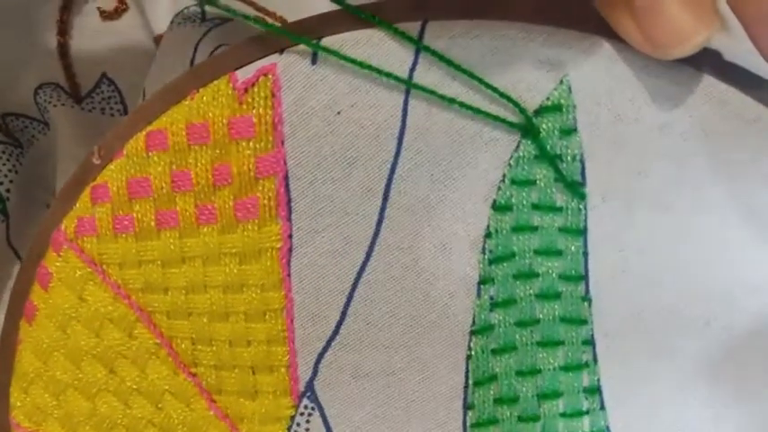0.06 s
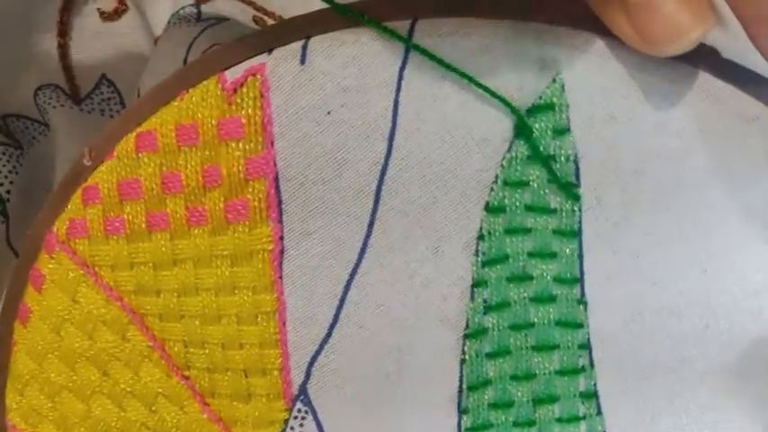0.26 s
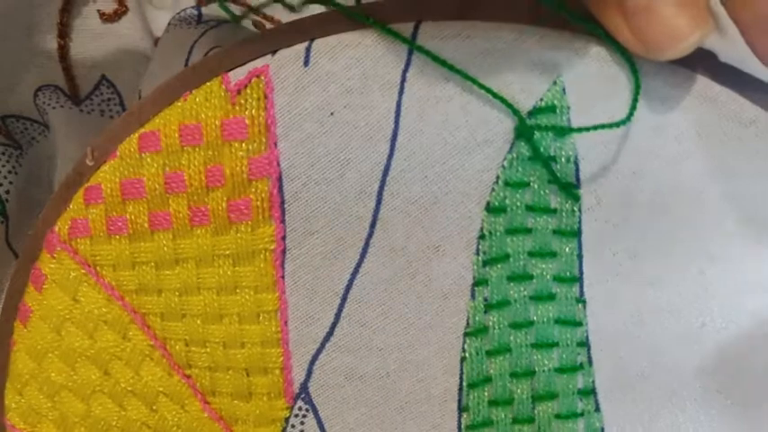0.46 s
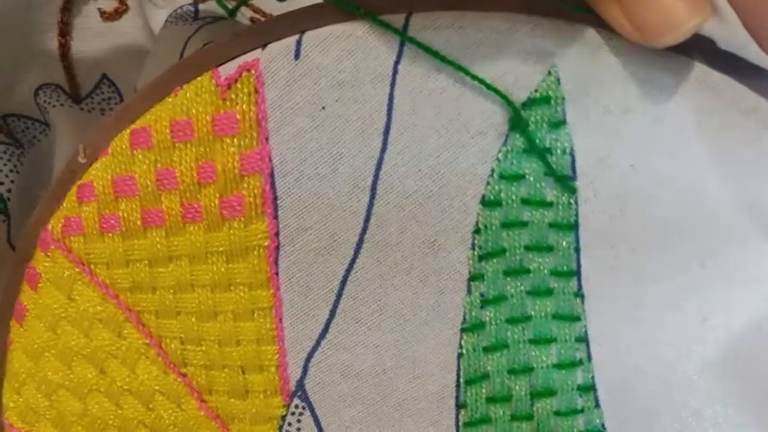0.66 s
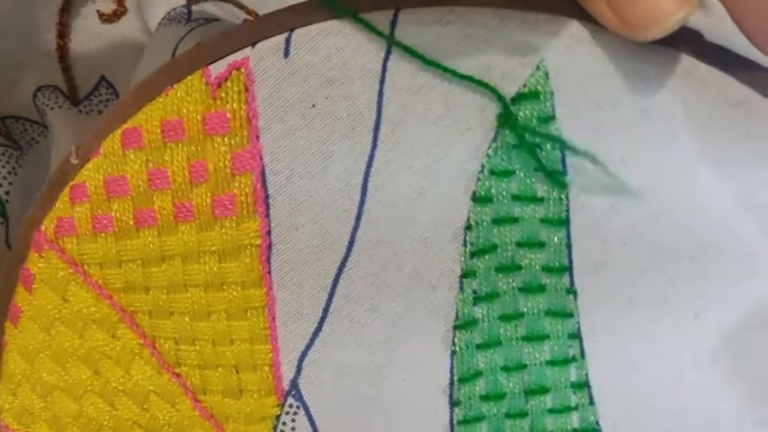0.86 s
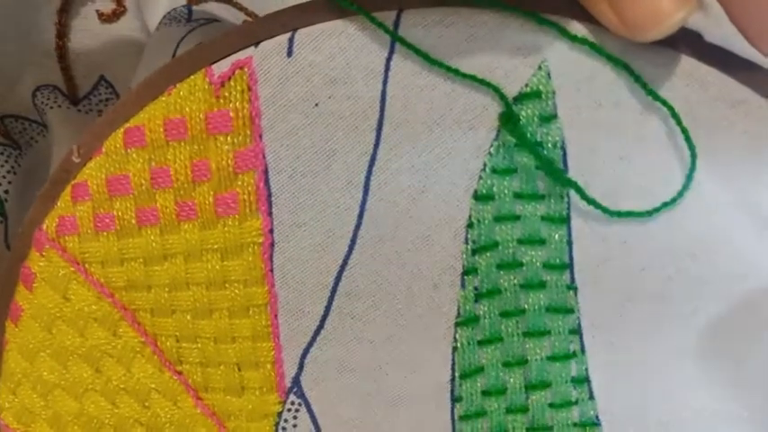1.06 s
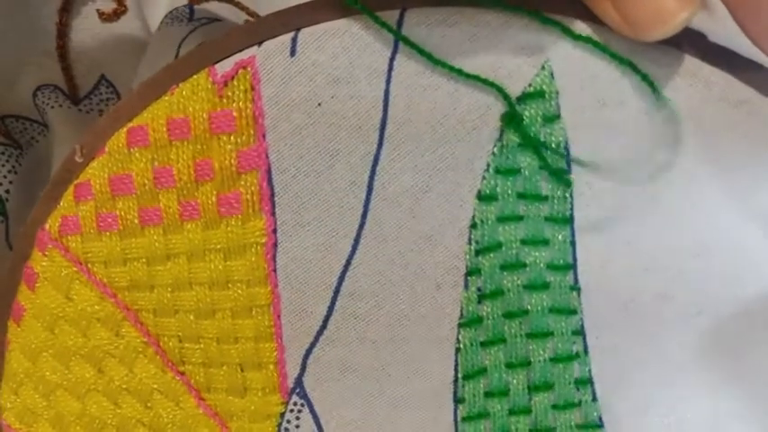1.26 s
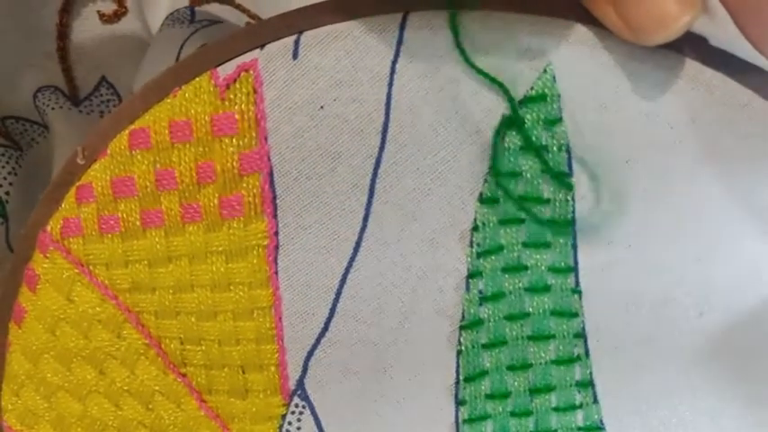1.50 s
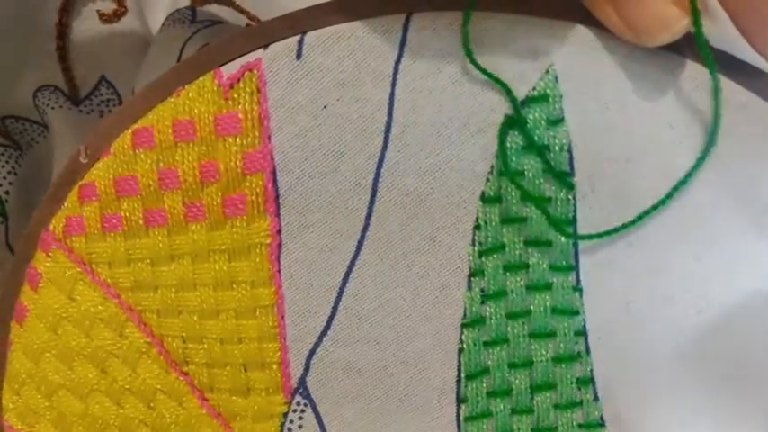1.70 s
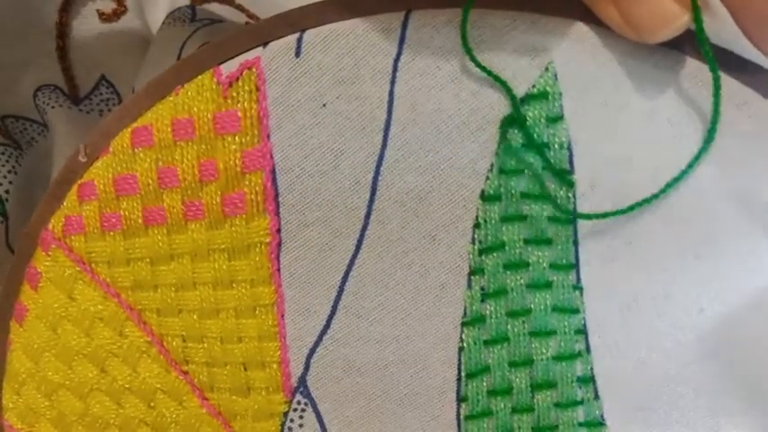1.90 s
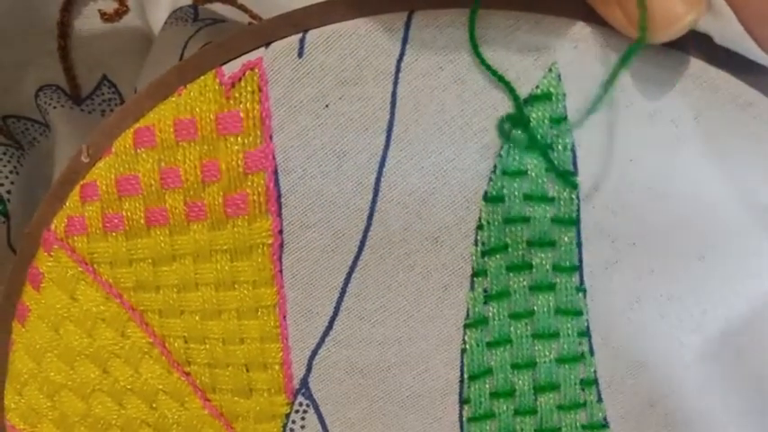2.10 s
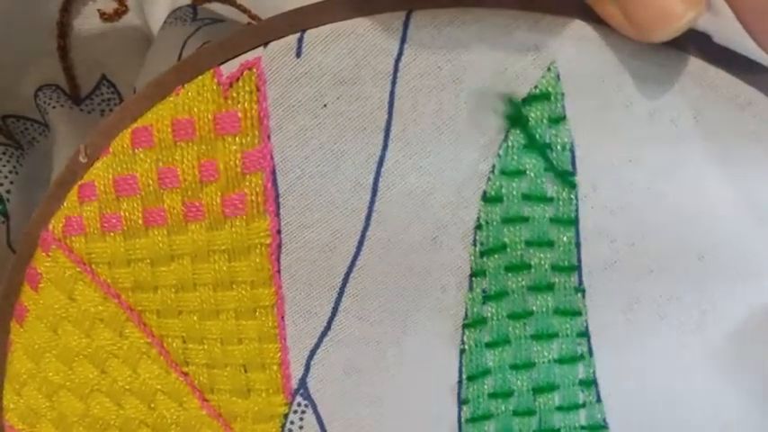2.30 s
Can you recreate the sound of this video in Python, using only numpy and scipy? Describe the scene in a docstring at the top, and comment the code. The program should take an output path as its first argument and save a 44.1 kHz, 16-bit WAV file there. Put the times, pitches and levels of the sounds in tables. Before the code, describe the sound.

An embroidery needle pops sharply through taut cloth at about 0.2 and 0.8 seconds, close by, each pop with a short drumlike ring and a rasp of yarn. Soft hissing pulls and light ticks surround the pops. The yarn is drawn again around 1.3 seconds and from 1.9 to 2.4. Fingers bump the cloth near 1.4 and 2.3 seconds, when the stitch tightens with a faint creak in the quiet room.

```python
"""An embroidery needle pops twice through cloth stretched in a hoop, close up in a quiet room.
Each pop is a sharp snap and a ring of the cloth like a small drum, then the rasp of yarn following.
Around the pops the yarn is drawn through in soft hissing strokes, with light needle ticks and
finger bumps. The last pull creaks as the stitch draws tight."""
import sys
import numpy as np
from scipy import signal
from scipy.fft import rfft, irfft
from scipy.io import wavfile
from scipy.ndimage import uniform_filter1d

SR = 44100
rng = np.random.default_rng(int(sys.argv[2]) if len(sys.argv) > 2 else 0)


def log_audio(samples):
    """Write samples as a 16-bit WAV file to the path given in sys.argv[1]."""
    # one column per channel
    frames = np.atleast_2d(samples).T
    # limit to full scale, then quantise
    limited = np.clip(frames, -1, 1)
    pcm = np.round(limited * 32767).astype(np.int16)
    wavfile.write(sys.argv[1], SR, pcm)


N = 108045
T = np.arange(N) / SR


def amp(db):
    """Decibels to gain."""
    return 10 ** (np.asarray(db) / 20)


def unit(x):
    """Scales to rms 1."""
    return x / np.sqrt(np.mean(x ** 2) + 1e-20)


def read(curve, hz):
    """Reads a curve on a log-frequency axis."""
    freqs, values = np.transpose(curve)
    return np.interp(np.log(hz + 1), np.log(freqs + 1), values)


def colour(x, eq):
    """Applies an EQ curve."""
    hz = np.fft.rfftfreq(x.shape[-1], 1 / SR)
    return irfft(rfft(x) * amp(read(eq, hz)), x.shape[-1])


def stereo(three, right_db, likeness=.78):
    """One shared and two separate signals make a partly alike stereo pair."""
    return (np.sqrt(likeness) * three[0] + np.sqrt(1 - likeness) * three[1:]) * amp([[0], [right_db]])


def noise(eq, right_db):
    """Coloured stereo noise."""
    return stereo(unit(colour(rng.standard_normal((3, N)), eq)), right_db)


def friction(eq, right_db, slips_per_s=1400, smooth=1):
    """Fibres catch and slip at random over a smooth sliding noise."""
    slips = unit(rng.standard_normal((3, N)) * (rng.random(N) < slips_per_s / SR))
    slide = smooth * rng.standard_normal((3, N))
    return stereo(unit(colour(slips + slide, eq)), right_db)


def hit(start, rise_s, t60):
    """Envelope: fast attack, exponential decay."""
    t = T - start
    return np.clip(t / rise_s + 1 / 2, 0, 1) * amp(-60 * np.maximum(t - rise_s / 2, 0) / t60)


def pull(start, length, growth_db, rise_s=.045, fall_s=.027):
    """Envelope: attack, a hold that grows or sags towards 0 dB, release."""
    t = T - start
    hold = amp(growth_db * (np.clip(t / length, 0, 1) - 1))
    return np.clip(t / rise_s, 0, 1) * hold * np.exp(-np.maximum(t - length, 0) / fall_s)


# Air bed EQ (frequency [Hz], gain [dB])
AIR_EQ = [(20, 4), (45, 0), (70, -10), (100, 4.5), (165, -4), (230, -5.5), (400, -11.5), (700, -23),
          (1500, -28), (4500, -35.5), (8200, -31.5), (10500, -39), (15000, -47.5)]
# Low hums (frequency [Hz], level [dB])
HUMS = [(71.5, -61), (156, -62)]


def room_tone(air_db=-56.5, right_db=-5.5):
    """Still air with a low hum."""
    hum = sum(np.sqrt(2) * amp(db) * np.sin(2 * np.pi * (hz * T + rng.random())) for hz, db in HUMS)
    return amp(air_db) * noise(AIR_EQ, right_db) + hum * amp([[0], [right_db]])


# Reverb decay (frequency [Hz], t60 [s])
ROOM_T60 = [(200, .3), (1000, 0.39), (4000, .27), (9000, .25), (15000, 0.19)]
# Reverb send (frequency [Hz], gain [dB])
ROOM_SEND = [(200, -20.5), (800, -24.5), (1400, -7), (3000, 0), (8000, -5)]


def reverb(x):
    """Short diffuse tail of a small room."""
    hz, t, bands = signal.stft(rng.standard_normal((2, SR // 2)), SR, nperseg=256)
    t60 = read(ROOM_T60, hz)[:, None]
    decay = amp(read(ROOM_SEND, hz)[:, None] - 60 * t / t60)
    equal_energy = np.sqrt(2 * np.log(1000) / (t60 * SR))
    tail = signal.istft(bands * decay * equal_energy, SR, nperseg=256)[1]
    return signal.fftconvolve(x.mean(0)[None], tail, axes=1)[:, :N]


# Modes of the taut cloth (frequency [Hz], level [dB], t60 [s])
CLOTH_MODES = [(214, -49.5, .12), (302, -26, 0.092), (359, -26, 0.057), (425.6, -17, 0.044),
               (556, -17, 0.052), (767, -18.5, .11), (899, -22.5, .09), (912, -10.5, 0.068),
               (1084, -22, 0.091), (1189, -14, 0.033), (1407, -28.5, .05), (1933, -23.5, 0.027),
               (2635, -26.5, 0.028), (2860, -24, 0.036)]


def cloth(start, weight_db, give_s=.0016, low_cut_hz=250):
    """The cloth gives, springs back at start and rings; weight_db(hz) sets each mode's share."""
    near = abs(T - start) < 1 / 4
    t, out = T[near] - start, np.zeros(N)
    ring = sum(amp(db + weight_db(hz) - 60 * np.maximum(t, 0) / t60) * np.cos(2 * np.pi * hz * t)
               for hz, db, t60 in CLOTH_MODES)
    give = np.exp(-(np.minimum(t, 0) / give_s) ** 2)
    low_cut = signal.butter(2, low_cut_hz, "highpass", fs=SR, output="sos")
    out[near] = signal.sosfilt(low_cut, -ring * give)
    return out


# Fingers on the cloth (time [s], level [dB], roll-off corner [Hz])
BUMPS = [(.610, -35, 810), (1.016, -45, 640), (1.363, -13.5, 292), (2.3329, -12, 324)]


def finger_bumps(db_per_octave=-28, right_db=-1.5):
    """Soft knocks wake mainly the low modes of the cloth."""
    thuds = sum(amp(db) * cloth(start, lambda hz: db_per_octave * max(np.log2(hz / corner), 0))
                for start, db, corner in BUMPS)
    return thuds * amp([[0], [right_db]])


# Light ticks (time [s], level [dB], t60 [s])
TICKS = [(0.427, -44.5, 0.021), (0.522, -36.5, 0.022), (0.605, -51, 0.029), (.78, -37, 0.035),
         (.969, -46, 0.015), (0.9962, -36, 0.044), (1.109, -56, 0.052), (1.72, -54.5, .04)]
# Bright tick EQ (frequency [Hz], gain [dB])
TICK_EQ = [(200, -8), (900, -6.5), (2500, -4.5), (3800, 0.5), (5000, -4), (7000, 0), (8700, 5),
           (10000, -13), (15000, -31)]


def needle_ticks(rise_s=.0045):
    """The needle point flicks over single threads."""
    flicks = sum(amp(db) * hit(start, rise_s, t60) for start, db, t60 in TICKS)
    return flicks * noise(TICK_EQ, right_db=-11)


# The last tug (time [s], length [s], level [dB], growth [dB])
TUG = (2.31, .11, -59, -4)
# Nasal creak EQ (frequency [Hz], gain [dB])
CREAK_EQ = [(900, -26), (1400, 1), (1620, 6), (1900, -4), (2220, 6), (2550, -10), (2900, -3), (3600, -10),
            (4300, -47), (9000, -32)]


def stitch_creak():
    """Stretched yarn creaks in the hole as the stitch draws tight."""
    start, length, db, growth_db = TUG
    return amp(db) * pull(start, length, growth_db) * friction(CREAK_EQ, right_db=-7)


# Yarn pulls (time [s], length [s], drum level [dB], rub level [dB], hiss level [dB], growth [dB])
STROKES = [(0, 0.033, -64.5, -66.5, -69.5, -20.5), (0.045, 0.16, -44.5, -43.5, -53, 4.5),
           (0.385, 0.091, -63, -73, -60, 6), (0.518, 0.099, -56, -54, -63, 8),
           (0.633, 0.19, -46, -42, -54.5, 4), (0.913, 0.12, -65, -54, -55.5, 17),
           (1.035, 0.21, -71, -69.5, -68.5, -4.5), (1.228, 0.22, -44.5, -45.5, -53.5, 9),
           (1.681, 0.044, -80, -67, -60.5, -7.5), (1.744, .12, -71.5, -74, -71.5, -4),
           (1.864, 0.27, -56.5, -61.5, -65.5, -4.5), (2.131, 0.19, -44, -48, -53.5, 12.5),
           (2.325, 0.1, -54.5, -71, -67.5, -7)]
# EQs for the low drumming, mid rub and airy hiss (frequency [Hz], gain [dB])
DRUM_EQ = [(60, -16.5), (130, 0.5), (220, 3), (310, 6), (450, -4), (620, -2), (780, -5), (1000, -31.5),
           (2000, -46.5)]
RUB_EQ = [(250, -17.5), (600, 8), (850, 1.5), (1150, -0.5), (1600, -15), (2250, -11.5), (3000, -17),
          (4300, -30.5), (8000, -30)]
HISS_EQ = [(1000, -5), (3000, -5.5), (4600, -8.5), (6000, -0.5), (8500, 4), (9400, -3.5), (10200, -15.5),
           (15000, -30.5)]


def yarn_strokes(extra_rub_growth_db=7, flutter_db=1, flutter_s=.032):
    """Yarn drawn through the cloth drums it, rubs the hole and hisses unevenly."""
    drum = friction(DRUM_EQ, right_db=-1.5)
    rub = friction(RUB_EQ, right_db=-7)
    hiss = friction(HISS_EQ, right_db=-3)
    out = np.zeros((2, N))
    for start, length, drum_db, rub_db, hiss_db, growth_db in STROKES:
        out += pull(start, length, growth_db) * (amp(drum_db) * drum + amp(hiss_db) * hiss)
        out += pull(start, length, growth_db + extra_rub_growth_db) * amp(rub_db) * rub
    flutter = unit(uniform_filter1d(rng.standard_normal(N), round(flutter_s * SR)))
    return out * amp(flutter_db * flutter)


# EQs for the rasp's body, its right-channel trim and the fizz on top (frequency [Hz], gain [dB])
RASP_EQ = [(100, -29), (450, -14), (700, -11), (880, 1.5), (1170, -2), (1700, -19.5), (2800, -24.5),
           (4200, -40), (9000, -37), (15000, -61)]
RASP_RIGHT_EQ = [(300, -18.5), (900, -32), (1500, -3.5), (3000, -38), (6000, -5)]
FIZZ_EQ = [(800, -16), (1600, -3), (2800, -0.5), (3800, 2), (4600, -0.5), (5300, 3), (6400, -3), (7400, 4),
           (8800, 0.5), (9800, -27.5), (15000, -43)]


def yarn_rasp(rasp_db_per_s=-95.5, fizz_db_per_s=-38.5, rise_s=.006, fall_s=.012):
    """After each pop the eye and doubled yarn judder through the fresh hole, and the fibres fizz."""
    left, right = friction(RASP_EQ, right_db=0, slips_per_s=700, smooth=.84)
    judder = np.array([left, colour(right, RASP_RIGHT_EQ)])
    fizz = noise(FIZZ_EQ, right_db=-7)
    out = np.zeros((2, N))
    for start, _, _, rasp_s, rasp_db, fizz_s, fizz_db in POPS:
        onset = start + SPRING_BACK_S
        out += amp(rasp_db) * pull(onset, rasp_s, rasp_db_per_s * rasp_s, rise_s, fall_s) * judder
        out += amp(fizz_db) * pull(onset, fizz_s, fizz_db_per_s * fizz_s, rise_s, fall_s) * fizz
    return out


SPRING_BACK_S = .0038  # from snap to ring and rasp
# Needle pops (time [s], snap level [dB], ring level [dB], rasp length [s], rasp end level [dB],
# fizz length [s], fizz end level [dB])
POPS = [(0.236, -14, 0, 0.11, -35.5, 0.072, -47), (.8466, -15.5, -1.3, 0.053, -32, 0.075, -44)]
# EQs for the snap and the ring's right-channel trim (frequency [Hz], gain [dB])
SNAP_EQ = [(100, -22), (800, 4.5), (2000, 4.5), (2800, 6), (3600, -4), (4600, -8.5), (5700, -5.5),
           (8500, 1), (9800, -13.5), (15000, -41.5)]
RING_RIGHT_EQ = [(200, -21.5), (420, -31), (800, -31.5), (1300, -13), (2500, -17.5)]


def needle_pops():
    """The needle snaps through the weave and the released cloth rings, close on the left."""
    snap = noise(SNAP_EQ, right_db=-8)
    out = np.zeros((2, N))
    for start, snap_db, ring_db, *_ in POPS:
        out += amp(snap_db) * hit(start, rise_s=.001, t60=.0091) * snap
        left = cloth(start + SPRING_BACK_S, lambda hz: 0)
        right = cloth(start + SPRING_BACK_S, lambda hz: read(RING_RIGHT_EQ, hz))
        out += amp(ring_db) * np.array([left, right])
    return out


def scene():
    """All the handwork in its room."""
    work = needle_pops() + yarn_rasp() + yarn_strokes() + stitch_creak() + needle_ticks() + finger_bumps()
    return work + reverb(work) + room_tone()


def record(dry):
    """Soft-clips the highest peaks, then cuts the extreme treble."""
    ceiling, cutoff_hz = .92, 15650
    rounded = dry / (1 + (dry / ceiling) ** 4) ** (1 / 4)
    low_pass = signal.firwin(511, cutoff_hz, window=("kaiser", 9), fs=SR)
    return signal.oaconvolve(rounded, low_pass[None], "same")


dry = scene()
out = record(dry)
log_audio(out)
```